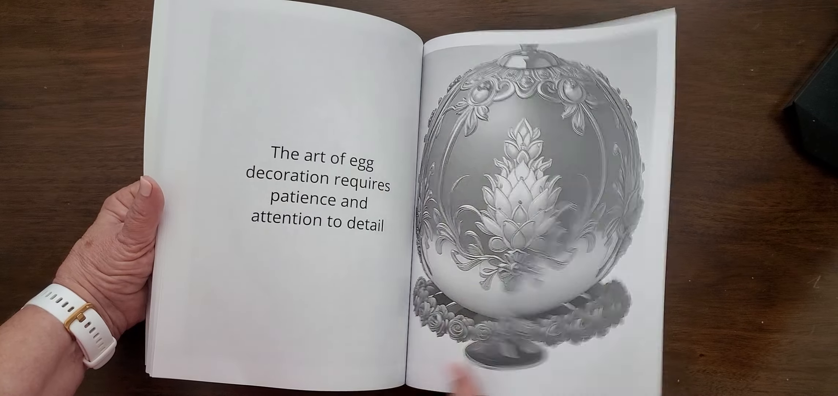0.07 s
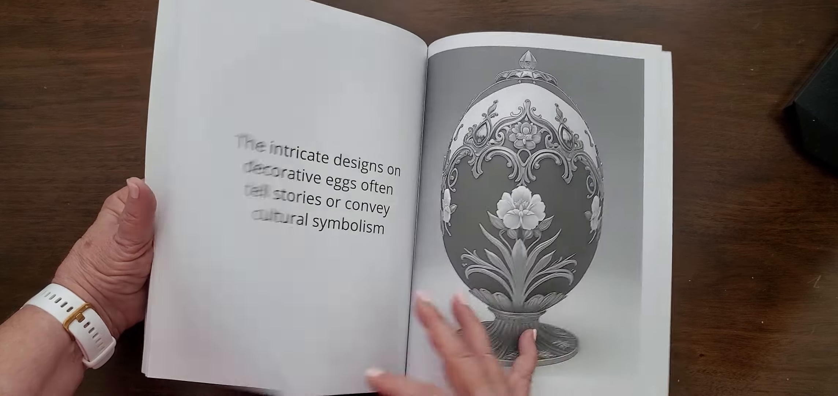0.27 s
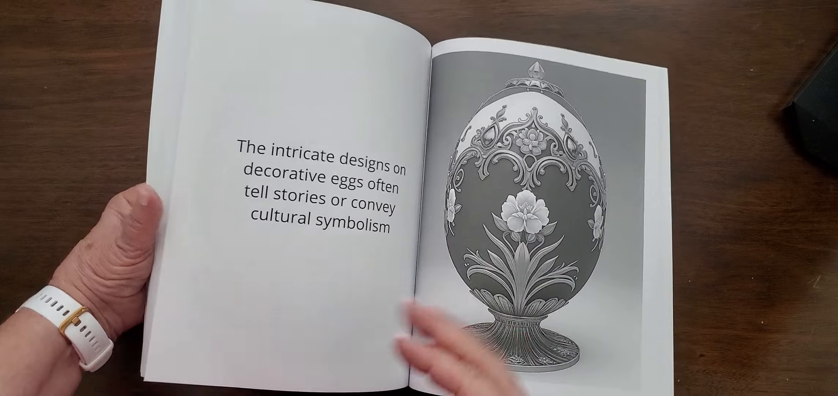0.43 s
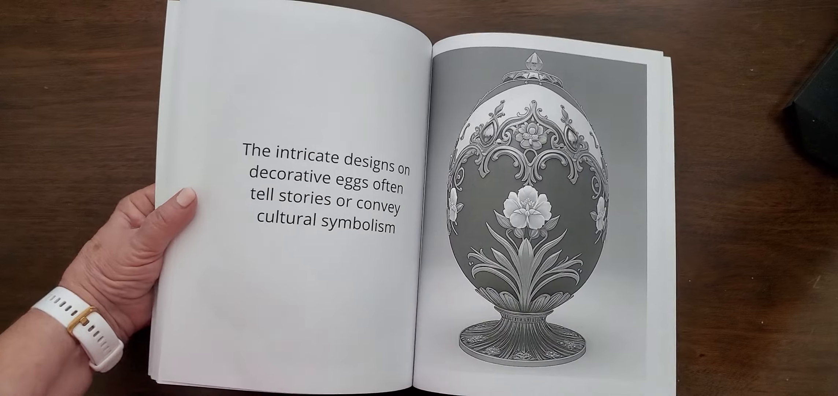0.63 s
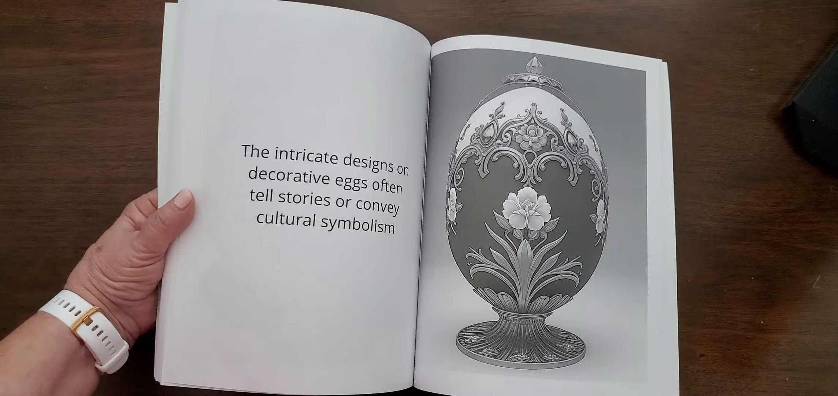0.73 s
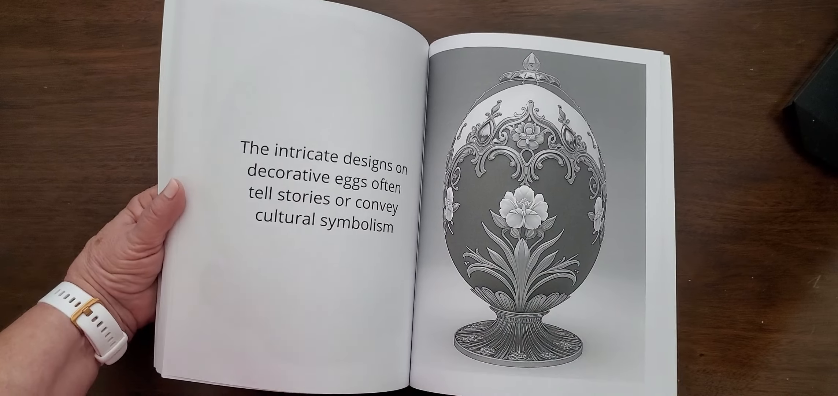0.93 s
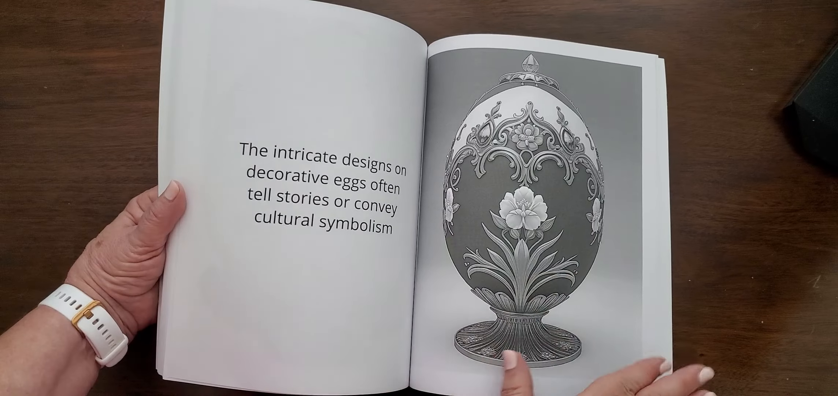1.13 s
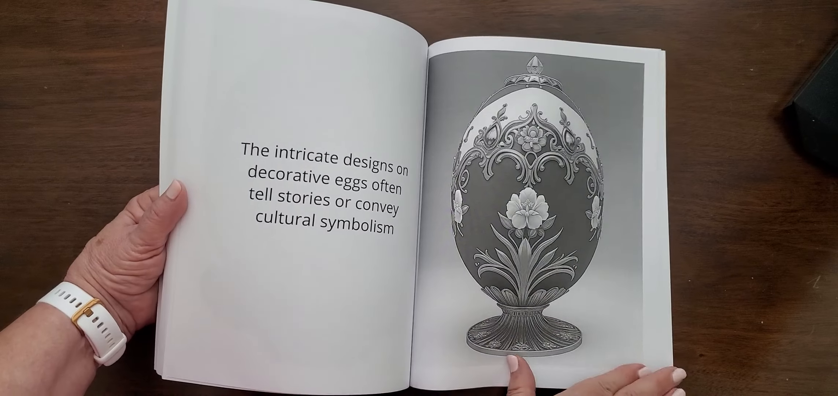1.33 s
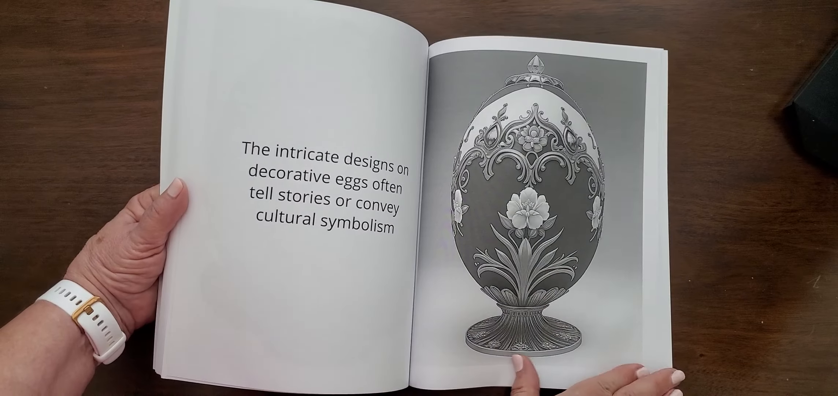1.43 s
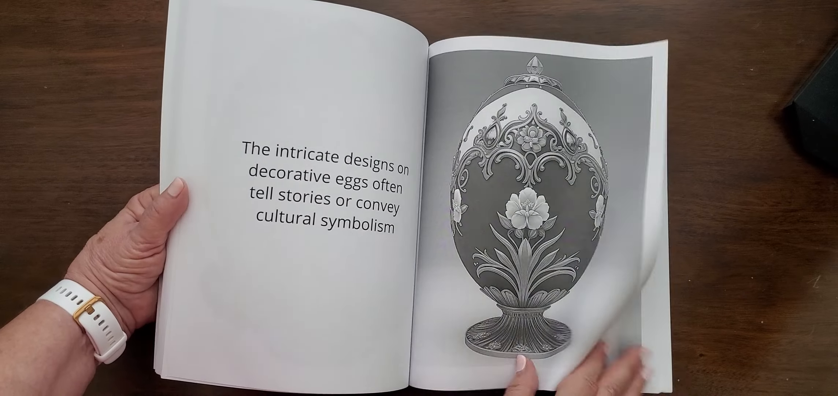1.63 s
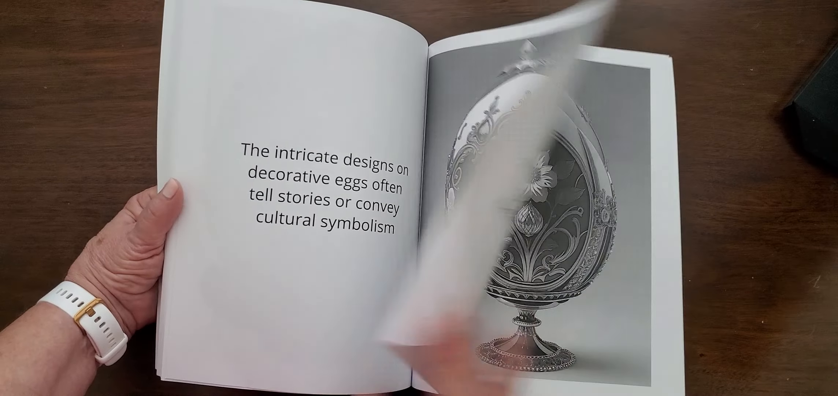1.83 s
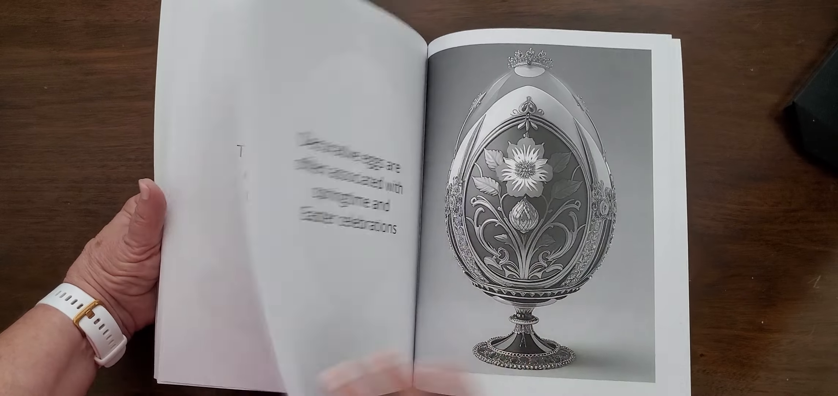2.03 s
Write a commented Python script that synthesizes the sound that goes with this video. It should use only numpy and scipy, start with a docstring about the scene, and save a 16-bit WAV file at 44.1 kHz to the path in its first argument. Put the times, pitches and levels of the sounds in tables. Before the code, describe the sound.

Large paperback pages turn by hand on a wooden table: a quick papery swish, two loud crackling snaps, fading flutter, faint finger brushes and ticks, then a second hissing page lift. Close stereo microphone, quiet small room.

```python
"""Pages of a large paperback turn on a wooden table, close up in a small room with still air and faint rumble.
A sheet slides off its neighbour (clouds of tiny clicks, coloured as hiss and rasp), buckles with two loud
snaps (crease bursts and damped pings) over soft low knocks, and flutters down as sparser, duller creases.
Fingers brush (click textures) and tick (pings), then lift the next corner with rising scrapes (narrow noise
bands), and a second sheet hisses across and begins to flop over. Sheet, table and room add resonance."""
import sys
import numpy as np
from scipy import signal
from scipy.fft import rfft, irfft
from scipy.io import wavfile

SR = 44100
rng = np.random.default_rng(int(sys.argv[2]) if len(sys.argv) > 2 else 0)


def unload_audio(sound):
    """Save the sound as a 16-bit wav file, at the path given as the first command line argument."""
    columns = np.transpose(np.atleast_2d(sound))
    # keep every value between -1 and 1, then stretch to whole-number steps
    steps = np.round(np.clip(columns, -1, 1) * 32767)
    wavfile.write(sys.argv[1], SR, steps.astype(np.int16))


N = 92610
TIME = np.arange(N) / SR  # seconds

# Paper slides on paper. Each row: time in seconds, level of the hiss in dB, level of the low rasp in dB.
FIRST_SLIDE = [(0, -53, -59.5), (.032, -56, -61), (.044, -52.5, -50), (.095, -55.5, -59.5),
               (.13, -40, -43.5), (.195, -37.5, -50.5), (.212, -30.5, -35), (.235, -47, -62),
               (.28, -58, -72), (.31, -49, -44.5), (.38, -56, -69), (.47, -72, -80.5)]
SECOND_SLIDE = [(1.60, -58.5, -57.5), (1.646, -50, -46.5), (1.675, -39.5, -42.5), (1.765, -33.5, -43.5),
                (1.792, -31, -53), (1.84, -40, -51), (1.871, -36.5, -42.5), (1.924, -52, -53.5),
                (1.979, -46, -46.5), (2.002, -57, -59), (2.021, -72, -56), (2.025, -49, -57),
                (2.046, -48.5, -56), (2.059, -37, -47.5), (2.1, -55, -57)]
# Tone of the hiss and of each slide's rasp. Each row: frequency in Hz, gain in dB.
HISS_COLOUR = [(200, -51), (1500, -13), (3000, -3), (5700, -6), (7500, -3), (9500, -7), (13000, -1.5),
               (15500, 2.5)]
FIRST_RASP_COLOUR = [(150, -32), (320, -9.5), (750, -9.5), (1300, -2.5), (2500, -2.5), (4500, -7),
                     (10000, -17.5)]
SECOND_RASP_COLOUR = [(240, -33), (400, -17), (1050, -17), (1600, -4), (2300, -3), (3500, -5.5), (6000, -9),
                      (10000, -12.5), (16000, -31)]
SLIPS_PER_S, SLIP_SPREAD_DB = 11000, 2  # clicks of the hiss
HISS_PAN_DB, RASP_PAN_DB = 2, 0.5  # left over right

# Tone of the still air. Each row: frequency in Hz, gain in dB.
AIR_COLOUR = [(25, -10.5), (70, -1), (140, -13.5), (600, -14.5), (2000, -18), (3200, -13.5), (9000, -31),
              (16000, -20)]
AIR_DB, RUMBLE_DB, RUMBLE_HZ = -74, -79.5, 65

# The sheet buckles. Each row: start in seconds, level in dB, rise in seconds, decay in seconds,
# low edge in Hz, high edge in Hz, left over right in dB.
BUCKLES = [(.207, -32.5, 0.0034, 0.042, 2200, 15000, -1.5), (0.2202, -19, 0.0025, 0.0061, 303, 6400, -1),
           (0.226, -20.5, 0.0037, 0.02, 450, 5180, 3.5), (0.3097, -26.5, 0.00068, 0.0094, 2180, 3860, 4),
           (.319, -31, 0.006, 0.058, 530, 4210, -1.5), (0.338, -22, 0.0034, 0.0038, 485, 6200, -0.5),
           (0.344, -20.5, 0.009, 0.012, 363, 4280, 1), (0.446, -34.5, 0.0019, 0.018, 980, 1840, 1),
           (.494, -40.5, 0.008, 0.015, 760, 1580, 0.5), (0.574, -49, 0.0091, 0.011, 390, 800, -3.5),
           (1.852, -50, 0.0067, 0.0091, 260.3, 4000, -2.5), (1.952, -44, 0.022, 0.019, 1450, 2500, 0),
           (2.0232, -48.5, 0.0007, 0.045, 630, 1400, 1), (2.048, -45.5, 0.0015, 0.048, 270, 2300, -2),
           (2.083, -40, 0.0076, 0.06, 450, 2120, 1.5)]
# Tone of the creases. Each row: frequency in Hz, gain in dB.
CREASE_COLOUR = [(60, -17.5), (200, 7.5), (450, -0.5), (800, 3.5), (1500, 4), (2500, 3.5), (3700, -0.5),
                 (4800, -8), (8000, -13.5), (16000, -20)]
CREASES_PER_S, CREASE_SPREAD_DB = 5400, 4
# Single creases snap through. Each row: start in seconds, level in dB before filtering, pitch in Hz.
SNAPS = [(.2218, -11.5, 920), (0.2251, -9.5, 2150), (0.2312, -11.5, 1640), (0.3088, -23.5, 3080),
         (0.3457, -15.5, 2400), (0.3512, -15.5, 1116), (0.3593, -17, 953)]
SNAP_DECAY_S, SNAP_PAN_DB = 0.00084, 3
CONTACT_S = 0.00016  # a tick or snap takes this long to build

# Soft knocks of hand and page on the book. Each row: start in seconds, level in dB, pitch in Hz,
# rise in seconds, decay in seconds.
THUMPS = [(0.217, -45.5, 75, 0.0069, 0.03), (.335, -50, 80.4, 0.0078, .035),
          (0.343, -48.5, 126, 0.012, 0.051), (1.347, -57, 400, 0.0037, 0.02),
          (1.418, -57, 520, 0.0035, 0.049), (1.429, -57.5, 130.7, 0.042, 0.037),
          (2.045, -55.5, 77, .02, 0.056), (2.023, -59, 283, 0.028, 0.12)]
THUMP_WIDTH, THUMP_TONE = 0.91, 0.69  # width as a share of the pitch; share of clean ring in low knocks

# The loose sheet flutters as it settles. Each row: time in seconds, level in dB.
FLUTTER = [(.22, -45), (.26, -35), (.30, -39), (.38, -38), (.43, -44.5), (.52, -52.5), (.58, -59),
           (.68, -69)]
# Tone of the flutter. Each row: frequency in Hz, gain in dB.
FLUTTER_COLOUR = [(60, -16), (250, -9.5), (600, -5.5), (1100, -3), (1700, 0), (2700, -6), (4500, -19),
                  (9000, -33.5), (16000, -35)]

# Fingers brush the page. Each row: time in seconds, level in dB, level of the added treble in dB.
BRUSH = [(.55, -62, -69.5), (.65, -71.5, -85), (.675, -64.5, -68.5), (.89, -69, -77.5), (.94, -61.5, -74.5),
         (1.09, -64, -73), (1.15, -66.5, -65), (1.2, -72.5, -77.5), (1.343, -78.5, -99),
         (1.35, -59.5, -62.5), (1.375, -64.5, -71.5), (1.432, -59, -59.5), (1.452, -57.5, -63.5),
         (1.47, -60, -73), (1.52, -67, -84), (1.555, -59.5, -66), (1.6, -60.5, -89)]
# Tone of the brushing. Each row: frequency in Hz, gain in dB.
BRUSH_COLOUR = [(60, -31), (200, 0.5), (550, 7.5), (950, 7), (1250, 11), (2200, 3.5), (3900, 5.5),
                (4700, 5), (6000, 2), (7900, 3.5), (9000, -51.5), (15500, -25.5)]
# Fingernails and page corner tick. Each row: start in seconds, level in dB, pitch in Hz, decay in seconds.
TICKS = [(1.0175, -44, 3230, 0.0014), (1.0177, -50.5, 7050, 0.0011), (1.0722, -46, 3880, 0.0014),
         (1.08, -41.5, 3850, 0.0007), (1.0795, -51, 1273, 0.0093), (1.0819, -36.5, 2770, 0.00036),
         (1.3085, -55.5, 1405, 0.0016), (1.3471, -42.5, 7960, 0.00017)]
GRIT_DB, GRIT_DECAY_S = -16, 0.0053  # paper crackle, relative to its tick

# The lifted corner scrapes. Each row: time in seconds, level in dB, centre in Hz.
SCRAPE = [(1.37, -72, 1643), (1.50, -64.5, 1611), (1.62, -59.5, 1587), (1.69, -57, 1886), (1.76, -59, 1885),
          (1.85, -53, 1860)]
# A fingertip drags on the page edge. Each row: time in seconds, level in dB, centre in Hz.
EDGE_RUB = [(1.37, -74, 5000), (1.435, -54, 5160), (1.48, -72, 5200), (1.60, -81, 5100), (1.645, -43, 5200),
            (1.72, -48, 5720), (1.80, -48, 5790), (1.85, -57, 5800)]
SCRAPE_PAIR, SCRAPE_WAVER = 1.16, 0.0119  # upper resonance over the lower; wander as a share of the pitch

# Resonances of the curved sheet. Each row: frequency in Hz, gain in dB, left over right in dB.
SHEET_MODES = [(369.3, 3.5, 4.5), (612, 8, -2.5), (771.4, 7, -0.5), (901, 6, 5.5), (1047, 6, -3),
               (1430, 3.5, -0.5), (1530, -0.5, 5), (1714, 7.5, 11), (2333, 4, 6.5)]
RING_DB, RING_T60_S = -6.5, 0.12
TABLE_ECHO_DB, TABLE_LAGS_S = -16, (0.0031, 0.0023)  # lags are left, right
ROOM_DB, ROOM_T60_S, ROOM_TREBLE_T60_S, ROOM_BUILD_S = -18.5, 0.43, 0.1, 0.0036
CHANNEL_LAG_S, SHARED = 0.00038, 0.15  # right hears shared sound later; share of power common to both
TOP_HZ = 15900


def amp(db):
    """Decibels to gain."""
    return 10 ** (np.asarray(db) / 20)


def unit(x):
    """Scale to rms 1."""
    return x / np.sqrt(np.mean(x ** 2) + 1e-20)


def curve(rows, axis=1):
    """Gain over time from a dB column; it dies away outside the rows."""
    rows = np.array(rows)
    times = rows[:, 0]
    outside = np.abs(TIME - np.clip(TIME, times[0], times[-1]))
    return amp(np.interp(TIME, times, rows[:, axis])) * np.exp(-outside / 0.006)


def colour(x, points):
    """Equalise a steady texture through (Hz, dB) points on a log-frequency scale; rms 1."""
    hz, db = np.array(points).T
    f = np.maximum(np.fft.rfftfreq(N, 1 / SR), 1)
    gain = amp(np.interp(np.log(f), np.log(hz), db))
    return unit(irfft(rfft(x) * gain, N))


def band(x, low_hz, high_hz, order=2):
    """Band-pass."""
    sos = signal.butter(order, [low_hz, high_hz], "band", fs=SR, output="sos")
    return signal.sosfilt(sos, x)


def pan(db):
    """Left and right gains, from the level of left over right."""
    return amp(np.array([[db], [-db]]) / 2)


def delay_right(x):
    """Stereo pair from one sound that reaches the right later."""
    return np.array([x, np.roll(x, int(CHANNEL_LAG_S * SR))])


def walk(rate_hz):
    """Smooth random wander, rms 1."""
    return unit(band(rng.standard_normal(N), rate_hz / 10, rate_hz))


def grains(rate, spread_db):
    """Dense tiny clicks at random times; some reach both channels, some only one."""
    hits = rng.random((3, N)) < rate / SR
    signs = rng.choice([-1, 1], (3, N))
    clicks = hits * signs * amp(spread_db * rng.standard_normal((3, N)))
    return np.sqrt(SHARED) * delay_right(clicks[2]) + np.sqrt(1 - SHARED) * clicks[:2]


def burst(x, start, rise, decay):
    """Open a texture with a quick rise and an exponential decay; about rms 1 at the top."""
    age = TIME - start
    env = np.clip(age / rise, 0, 1) * np.exp(-np.maximum(age - rise, 0) / decay)
    shaped = x * env
    energy = np.sum(shaped ** 2, axis=-1, keepdims=True) + 1e-20
    return shaped * np.sqrt(np.sum(env ** 2) / energy)


def ping(start, hz, decay):
    """One sharp contact rings a damped resonance."""
    age = np.maximum(TIME - start, 0)
    attack = np.clip(age / CONTACT_S, 0, 1)
    return np.sin(2 * np.pi * hz * age) * attack * np.exp(-age / decay)


def slides():
    """Fibres catch and slip: a bright hiss at the edge, a lower rasp from the face of the sheet."""
    hiss = pan(HISS_PAN_DB) * colour(grains(SLIPS_PER_S, SLIP_SPREAD_DB), HISS_COLOUR)
    slips = pan(RASP_PAN_DB) * grains(rate=3200, spread_db=3)
    out = 0
    for rows, rasp_colour in ((FIRST_SLIDE, FIRST_RASP_COLOUR), (SECOND_SLIDE, SECOND_RASP_COLOUR)):
        rasp = colour(slips, rasp_colour)
        out = out + hiss * curve(rows, axis=1) + rasp * curve(rows, axis=2)
    return out


def background():
    """Still room air, as coloured noise, over a faint building rumble, as a low noise band."""
    rumble = unit(band(rng.standard_normal(N), RUMBLE_HZ / 1.62, RUMBLE_HZ * 1.49))
    air = colour(rng.standard_normal((2, N)), AIR_COLOUR)
    return amp(AIR_DB) * air + amp(RUMBLE_DB) * rumble


def buckles():
    """Each buckle is an avalanche of small creases, with a few sharp snaps among them."""
    creases = colour(grains(CREASES_PER_S, CREASE_SPREAD_DB), CREASE_COLOUR)
    out = 0
    for start, db, rise, decay, low_hz, high_hz, pan_db in BUCKLES:
        own = np.roll(creases, rng.integers(N), axis=1)  # a different stretch of creases each time
        own = band(own, low_hz, high_hz, order=3)
        out = out + amp(db) * pan(pan_db) * burst(own, start, rise, decay)
    snaps = sum(amp(db) * ping(start, hz, SNAP_DECAY_S) for start, db, hz in SNAPS)
    snaps = band(snaps, 400, 6000)
    return out + pan(SNAP_PAN_DB) * delay_right(snaps)


def thumps():
    """Book and table answer a soft push with a damped thud; the low ones also ring."""
    out = 0
    for start, db, hz, rise, decay in THUMPS:
        spread = 1 + THUMP_WIDTH / 2
        thud = unit(band(rng.standard_normal(N), hz / spread, hz * spread))
        ring = unit(np.sin(2 * np.pi * hz * (TIME - start)))
        tone = THUMP_TONE if hz < 200 else 0
        out = out + amp(db) * burst(tone * ring + (1 - tone) * thud, start, rise, decay)
    return out


def flutter():
    """Sparser, duller creases while the sheet sinks onto the stack."""
    return curve(FLUTTER) * colour(grains(rate=770, spread_db=3.5), FLUTTER_COLOUR)


def fingers():
    """Skin brushes the page; nails and the corner give short pitched ticks with a little crackle."""
    skin = grains(rate=3500, spread_db=3.0)
    treble = unit(band(skin, 7560, TOP_HZ))
    out = curve(BRUSH, axis=1) * colour(skin, BRUSH_COLOUR) + curve(BRUSH, axis=2) * treble
    for start, db, hz, decay in TICKS:
        grit = burst(band(skin, hz / 2.3, hz * 1.22), start, CONTACT_S, GRIT_DECAY_S)
        out = out + amp(db) * (ping(start, hz, decay) + amp(GRIT_DB) * grit)
    return out


def scrape(rows, width_hz, ratios=(1,)):
    """Rubbed paper rings in wavering bands that climb overall as the corner curls and stiffens."""
    times, _, hz = np.array(rows).T
    pitch = np.interp(TIME, times, hz) * (1 + SCRAPE_WAVER * walk(19.25))
    phase = 2 * np.pi * np.cumsum(pitch) / SR
    lowpass = signal.butter(2, width_hz / 2, fs=SR, output="sos")
    out = 0
    for ratio in ratios:
        # slow noise on a cosine and a sine makes a noise band around the moving pitch
        a, b = signal.sosfilt(lowpass, rng.standard_normal((2, 2, N)))
        out = out + a * np.cos(ratio * phase) + b * np.sin(ratio * phase)
    return curve(rows) * unit(out)


def sheet(x):
    """Whatever creases or slides on the curved sheet also rings its modes."""
    t = TIME[:SR // 4]
    loss = np.log(1000) / RING_T60_S
    ring = sum(amp(db) * pan(pan_db) * np.cos(2 * np.pi * hz * t) for hz, db, pan_db in SHEET_MODES)
    ring = ring * np.exp(-loss * t) * 2 * loss / SR
    return x + amp(RING_DB) * signal.fftconvolve(x, ring, axes=1)[:, :N]


def table(x):
    """The table top returns an early copy to each channel."""
    echo = np.array([np.pad(side, (int(lag * SR), 0))[:N] for side, lag in zip(x, TABLE_LAGS_S)])
    gain = amp(TABLE_ECHO_DB)
    return (x + gain * echo) / np.hypot(1, gain)


def room(x):
    """A short diffuse tail whose treble dies first."""
    t = TIME[:SR // 2]
    noise = rng.standard_normal((2, SR // 2))
    body = band(noise, 150, 2700) * amp(-60 * t / ROOM_T60_S)
    treble = band(noise, 3100, 0.45 * SR) * amp(-60 * t / ROOM_TREBLE_T60_S)
    tail = (body + treble) * (1 - np.exp(-t / ROOM_BUILD_S))
    tail = tail / np.linalg.norm(tail, axis=1, keepdims=True)
    return signal.fftconvolve(x, tail, axes=1)[:, :N]


def scene():
    """Paper and hands in the room."""
    paper = table(sheet(slides() + buckles() + flutter()))
    corner = scrape(SCRAPE, width_hz=94, ratios=(1, SCRAPE_PAIR))
    edge = scrape(EDGE_RUB, width_hz=1660)
    near = paper + pan(-2.8) * thumps() + fingers() + corner + edge
    return near + amp(ROOM_DB) * room(near) + background()


def record(dry):
    """The recorder cuts the top with a steep low-pass."""
    return signal.sosfilt(signal.ellip(10, 0.2, 70, TOP_HZ, fs=SR, output="sos"), dry)


dry = scene()
out = record(dry)
unload_audio(out)
```